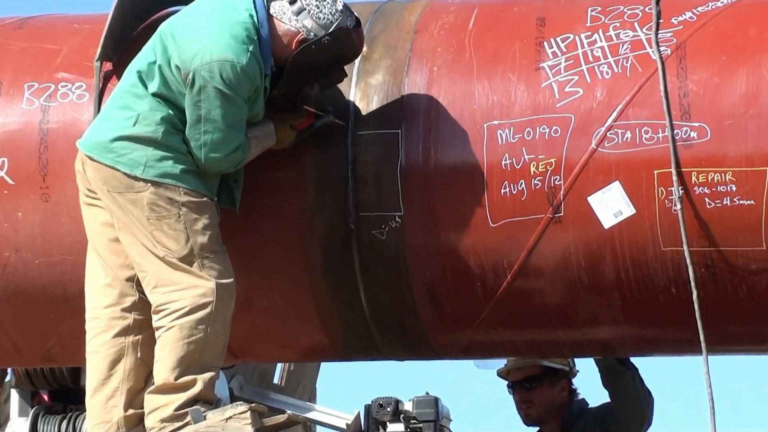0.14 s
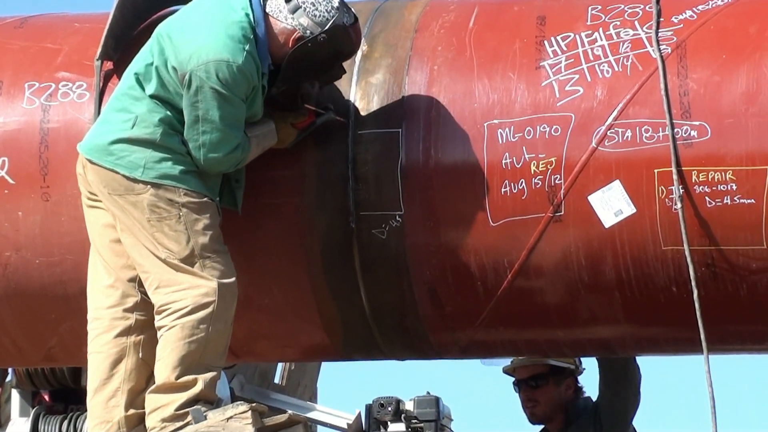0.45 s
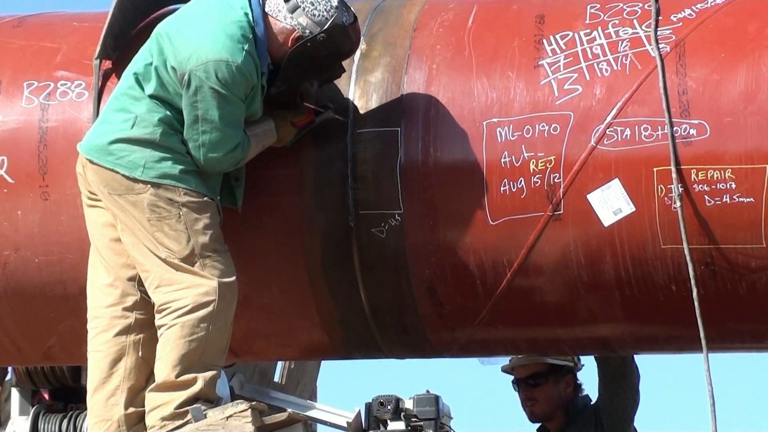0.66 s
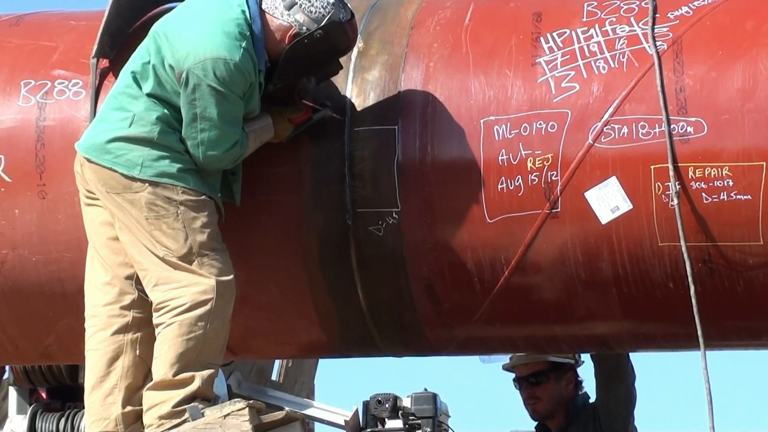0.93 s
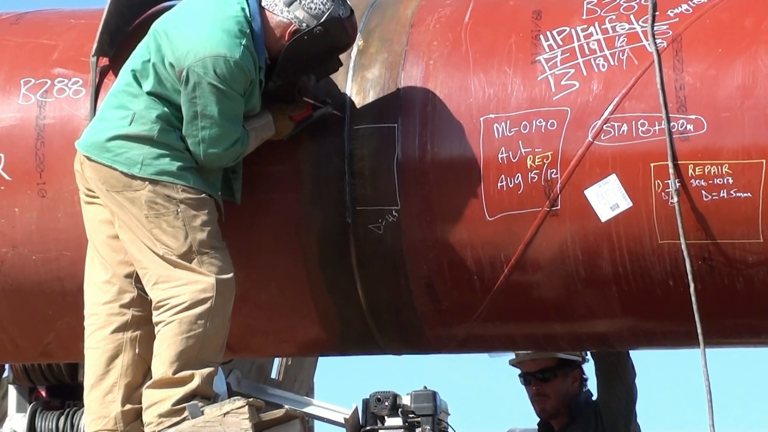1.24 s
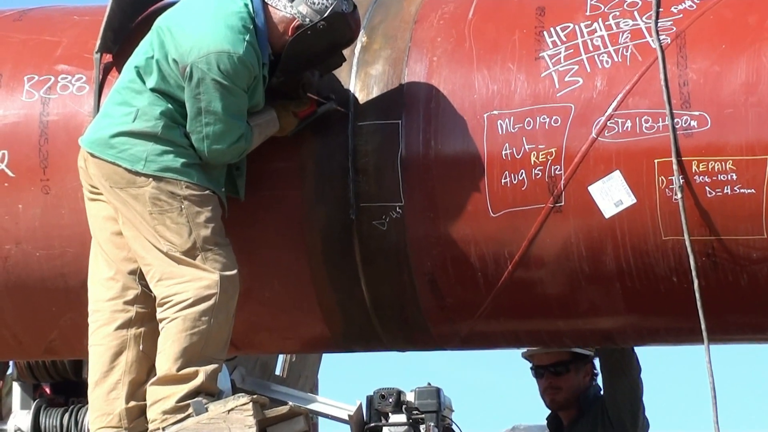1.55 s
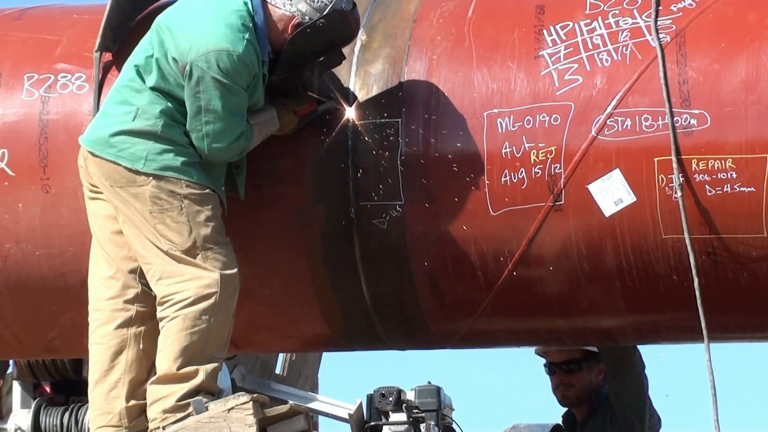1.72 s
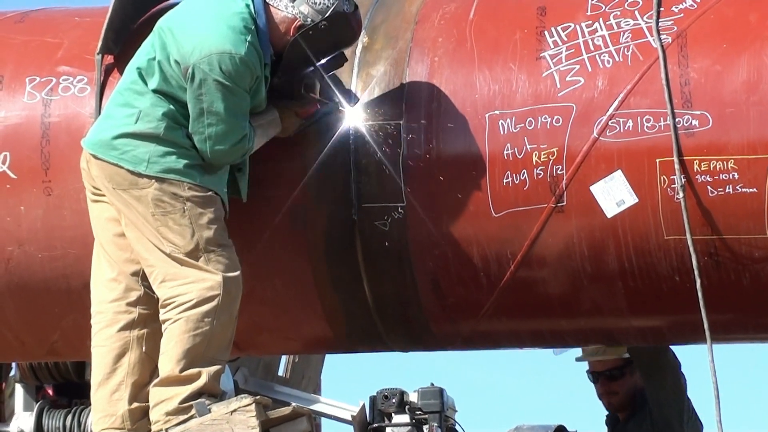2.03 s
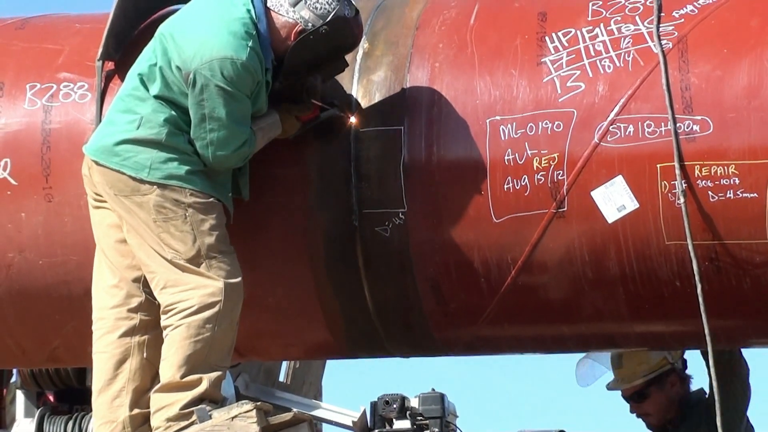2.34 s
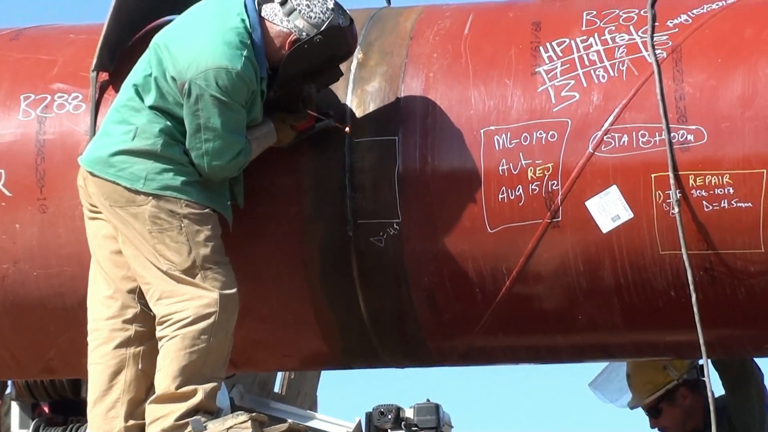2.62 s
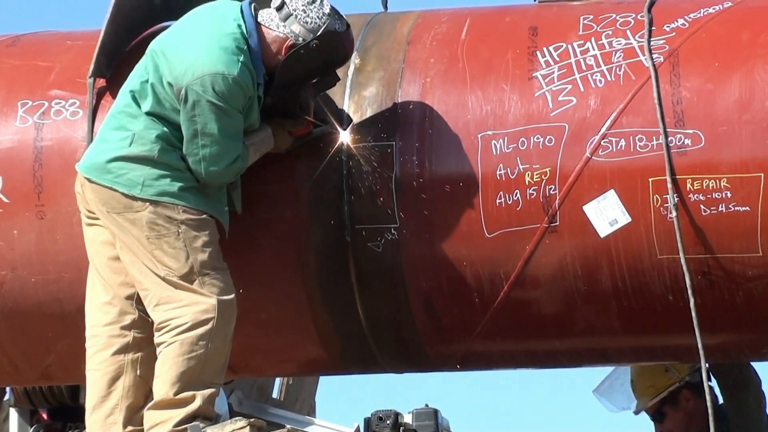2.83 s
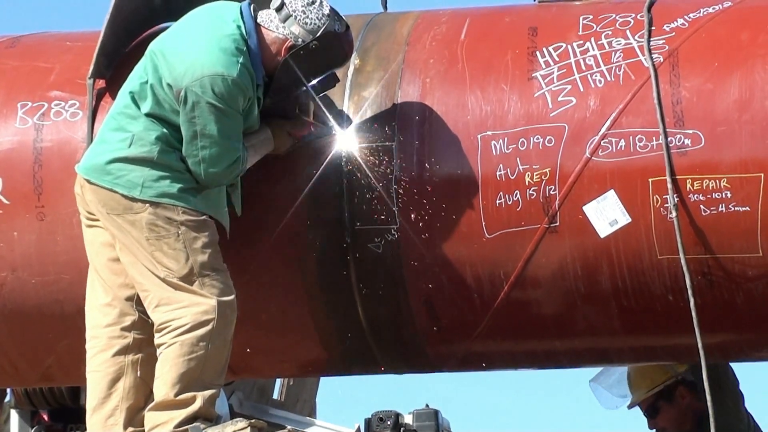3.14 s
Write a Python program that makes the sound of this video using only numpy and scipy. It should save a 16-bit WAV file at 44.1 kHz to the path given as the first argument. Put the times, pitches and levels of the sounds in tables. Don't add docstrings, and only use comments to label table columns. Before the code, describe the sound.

An air-arc gouging torch works a steel pipe outdoors. Low engines drone and throb alone until about 0.5 s, when compressed air snaps open into a bright rushing hiss, easing and shifting colour near 1.5 s. Harsh sizzling, crackling arc bursts strike at 1.7 s, longer at 2.1, then in quick sputters from 2.8 to 3.3. Camera gain ducks hiss and engines under the arcs, recovering slowly.

```python
import sys
import numpy as np
from scipy import signal
from scipy.fft import rfft, irfft
from scipy.io import wavfile
from scipy.ndimage import uniform_filter1d

SR = 44100
rng = np.random.default_rng(int(sys.argv[2]) if len(sys.argv) > 2 else 0)


def voltage_ratio(level):
    return 10 ** (np.asarray(level, float) / 20)


def unload_wav(signal):
    wavfile.write(
        sys.argv[1],
        SR,
        np.round(np.clip(np.atleast_2d(signal).T, -1, 1) * 32767).astype(np.int16),
    )


N = 144648


def rms_one(x):
    return x / np.sqrt(np.mean(x ** 2) + 1e-20)


def at_hz(points, hz):
    table_hz, values = np.array(points).T
    return np.interp(np.log(hz + 1), np.log(table_hz), values)


def drift(rate_hz):
    r = np.exp(-32 * np.pi * rate_hz / SR)
    noise = rng.standard_normal(N // 16 + 3002)
    slow = signal.lfilter([1], [1, -2 * r, r * r], noise)[3000:]
    return np.interp(np.arange(N) / 16, np.arange(len(slow)), rms_one(slow - slow.mean()))


def colour(pair, spectrum, peaks=(), alike=None, pan=None):
    hz = np.fft.rfftfreq(N, 1 / SR)
    db = at_hz(spectrum, hz)
    for peak_hz, width_hz, peak_db in peaks:
        db = db + peak_db / (1 + (2 * (hz - peak_hz) / width_hz) ** 2)
    likeness = np.clip(alike if np.isscalar(alike) else at_hz(alike, hz), 0, 1)
    mid, side = rfft(pair) * voltage_ratio(db)
    mid = np.sqrt(1 + likeness) * mid
    side = np.sqrt(1 - likeness) * side
    tilt = voltage_ratio((0 if pan is None else at_hz(pan, hz)) / 2)
    return rms_one(irfft([(mid + side) * tilt, (mid - side) / tilt], N))


# start_s, length_s, level_db, roar_share_db
STRIKES = [
    (1.723, 0.015, 10, -9),
    (1.735, 0.008, -2, 15),
    (1.776, 0.08, 6, 0),
    (2.107, 0.17, 11, 0),
    (2.818, 0.06, 9, -3),
    (2.869, 0.017, -7, 16),
    (2.89, 0.0041, -3, 6),
    (2.929, .029, 9.5, 5),
    (3.121, 0.15, 9, 0.5),
    (3.224, 0.053, -13, 7.5),
]
# pitch_hz, level_db (per Hz)
SIZZLE = [(800, -51), (4200, -9), (5300, -6), (7300, -0.5), (9000, -9.5), (11000, -23.5), (14000, -30.5),
          (16000, -16.5)]
# pitch_hz, width_hz, level_db
SIZZLE_PEAKS = [(4400, 190, 1.5), (5310, 350, 4.5), (6100, 280, -5), (7360, 280, 6), (8550, 190, 5.5),
                (10600, 700, 11), (11200, 400, -3), (12600, 1400, 9), (14500, 430, -9)]
# pitch_hz, level_db (per Hz)
FLASH = [(2000, -60), (9000, -15), (10800, 3), (13500, -6), (14200, -23), (16000, 5)]
# pitch_hz, level_db (per Hz)
ARC_ROAR = [(100, -37), (950, -16), (1300, -6), (2300, -0.5), (3500, 0.5), (4100, -6), (6000, -8),
            (11000, -50)]
# pitch_hz, width_hz, level_db
ARC_ROAR_PEAKS = [(1185, 67, 3.1), (1843, 84, 5.9), (2260, 83, 10), (2770, 100, 1.7), (3230, 130, 2.7)]
# pitch_hz, width_hz, level_db
HOLLOWS = [(2040, 250, -4), (2395, 120, -15.5), (3275, 220, -8.5), (3915, 290, -12), (4700, 140, -6),
           (5100, 100, 0.5), (5520, 110, -3), (6810, 310, -9.5), (7930, 190, -3), (8750, 160, -6),
           (9200, 250, -4.5), (13300, 250, 3)]
# pitch_hz, likeness (0-1)
TORCH_ALIKE = [(1000, .9), (2500, .97), (5000, .975), (7500, .975), (12000, .99)]


def arc():
    attack_s, release_s, flash_s, roar_lag_s = 0.005, 0.002, 0.0058, 0.017
    flash_db, roar_db = -17.5, -7
    t = np.arange(N) / SR
    sizzle, flash, roar = np.zeros((3, N))
    for start_s, length_s, level_db, share_db in STRIKES:
        u = np.maximum(t - start_s, 0)
        off = np.exp(-np.maximum(u - length_s, 0) / release_s)
        sizzle += voltage_ratio(level_db) * (1 - np.exp(-u / attack_s)) * off
        flash += voltage_ratio(level_db + flash_db) * u / flash_s * np.exp(1 - u / flash_s) * off
        swell = 1 - np.exp(-(u / min(roar_lag_s, length_s / 2)) ** 2)
        roar += voltage_ratio(level_db + share_db + roar_db) * swell * off

    spark_db = 2.8 * np.minimum(rng.exponential(1, N), 5)
    sparks_per_s, spark_share = 6500, 0.65
    sizes = voltage_ratio(spark_db) * rng.choice([-1, 1], N)
    sparks = rms_one(sizes * (rng.random(N) < sparks_per_s / SR))
    sputter = voltage_ratio(-1.5 * (drift(36.0) + drift(150.0)))
    burn = spark_share * sparks + (1 - spark_share) * rng.standard_normal((2, N))
    burn = burn * sputter
    burn[1] = np.roll(burn[1], N // 3)

    sizzling = sizzle * colour(burn, SIZZLE, SIZZLE_PEAKS + HOLLOWS, TORCH_ALIKE)
    flashing = flash * colour(burn, FLASH, HOLLOWS, TORCH_ALIKE)
    roaring = colour(burn[:, ::-1], ARC_ROAR, ARC_ROAR_PEAKS + HOLLOWS, TORCH_ALIKE)
    return sizzling + flashing + roar * voltage_ratio(0.84 * drift(39.0)) * roaring


# time_s, level_db
AIR = [
    (0, -35),
    (.525, -34),
    (0.548, -5),
    (.75, -5.5),
    (1.1, -7),
    (1.6, -11),
    (1.9, -7.5),
    (2.4, -7.5),
    (2.8, -9),
    (3.28, -10),
]
# pitch_hz, level_db (per Hz)
JET = [(800, -40), (1500, -17), (4000, -11.5), (6000, -8.5), (8000, -5), (11000, -15), (14000, -22.5),
       (16000, -12)]
POSE_S = [0.98, 1.45, 1.7]
# pitch_hz, width_hz, level_db
POSES = [
    [(6200, 500, 6.5), (7280, 820, 7), (8280, 930, 7), (9400, 560, -2), (10650, 1000, 10.5),
     (11600, 600, -4), (13450, 950, 11.5), (14600, 900, -10)],
    [(6650, 320, 9), (7100, 550, 11), (8400, 700, 2.5), (8800, 430, -3), (10000, 2000, 5.5),
     (11160, 500, -8), (12400, 800, 8), (13700, 370, 2)],
    [(6540, 420, 1.5), (7110, 530, 7.5), (8400, 640, 4), (9400, 400, -2), (10800, 1000, 5.5),
     (11600, 800, -6.5), (12850, 1200, 6.5), (14900, 690, -12)],
]


def air_jet():
    t = np.arange(N) / SR
    time_s, level_db = np.transpose(AIR)
    flutter_db = 0.47 * (drift(4.0) + drift(60.0))
    level = voltage_ratio(np.interp(t, time_s, level_db) + flutter_db)
    air = rng.standard_normal((2, N))
    hiss = 0
    for weights, peaks in zip(np.eye(len(POSES)), POSES):
        share = np.interp(t, POSE_S, weights)
        hiss = hiss + share * colour(air, JET, peaks + HOLLOWS, TORCH_ALIKE)
    return level * hiss


def patchy(x, spread_db):
    spec = signal.stft(x, nperseg=512)[2]
    field = rng.standard_normal(spec.shape[1:])
    field = uniform_filter1d(field, size=3, axis=0)
    field = uniform_filter1d(field, size=5, axis=1)
    return signal.istft(spec * voltage_ratio(spread_db * rms_one(field)), nperseg=512)[1][:, :N]


ORDERS = [2, 3, 4, 4.5, 5, 5.5, 8, 10, 11.5, 13.5, 14, 15, 16, 18.5, 20]
ORDER_DB = [-33.5, -30, -27, -35, -29.5, -36.5, -28, -38.5, -37.5, -36.5, -34.5, -40, -39, -37, -40.5]
# pitch_hz, level_db (per Hz)
ROAR = [(30, -18), (75, -49), (115, -5), (420, -11), (1010, -20.5), (8000, -25.5), (10300, -41.5),
        (16000, -50)]
# pitch_hz, width_hz, level_db
ROAR_PEAKS = [(762, 130, 4.5), (1540, 900, 1), (2270, 160, 4), (3100, 420, 4), (4030, 130, -2),
              (5950, 520, -1.5), (6630, 130, 8.5)]
# pitch_hz, level_db
ENGINE_PAN = [(60, -3.5), (110, -4.5), (200, -5.0), (380, -4.0), (700, -1.0), (1290, -2.0), (2380, -1.0),
              (4400, 0.0), (8120, 0.8), (15000, 0.0)]
# pitch_hz, likeness (0-1)
ENGINE_ALIKE = [(60, 1), (130, 1), (290, 0.85), (640, 0.85), (1410, 0.82), (3100, 0.82), (6820, 0.59),
                (15000, 1)]


def engines():
    shaft_hz, wander_hz, roar_db = 30.27, 5, -14.5
    t = np.arange(N) / SR
    tones = [(99.14, -30)]
    tones += [(order * shaft_hz, db) for order, db in zip(ORDERS, ORDER_DB)]
    drone = 0
    for hz, db in tones:
        phase = 2 * np.pi * (hz * t + rng.random()) + 0.25 * drift(wander_hz)
        sides = voltage_ratio(at_hz(ENGINE_PAN, hz) / 2 * np.array([[1], [-1]]))
        level = np.sqrt(2) * voltage_ratio(db + 6 + 1.2 * drift(wander_hz))
        drone = drone + sides * level * np.sin(phase)
    throb_db = -0.5 * np.sin(2 * np.pi * shaft_hz * t + 1.8 * drift(8.6))
    surge_db = -0.32 * drift(38.0)
    noise = voltage_ratio(throb_db + surge_db) * rng.standard_normal((2, N))
    return drone + voltage_ratio(roar_db) * colour(noise, ROAR, ROAR_PEAKS, ENGINE_ALIKE, ENGINE_PAN)


def scene():
    return patchy(arc() + air_jet(), 1.5) + engines()


def automatic_gain(dry):
    ceiling_db, fast_s, slow_s, creep_db_per_s = -13.5, 0.0012, 0.53, 3.5
    window = int(0.006 * SR) + 1
    power = np.sqrt(np.abs(uniform_filter1d(np.mean(dry ** 4, 0), window)) / 3)
    r = np.exp(-1 / (fast_s * SR))
    smooth = signal.lfilter([1 - r], [1, -r], power, zi=[power[0] * r])[0]
    fast = 10 * np.log10(smooth + 1e-12)
    step, slow, held = 44, ceiling_db, []
    for db in fast[::step]:
        if db > slow:
            slow += (db - slow) * step / SR / slow_s
        else:
            slow -= creep_db_per_s * step / SR
        held.append(slow)
    loudest = np.maximum(fast, np.repeat(held, step)[:N])
    return dry * voltage_ratio(ceiling_db - np.maximum(loudest, ceiling_db))


def top_cut(x):
    return signal.sosfilt(signal.butter(12, 16090, fs=SR, output="sos"), x)


def record(dry):
    end_fade_s, clip = 0.008, 1.3
    x = automatic_gain(dry) * np.minimum((N - np.arange(N)) / SR / end_fade_s, 1)
    x = clip * np.tanh(x / clip)
    x = signal.sosfilt(signal.ellip(12, 0.5, 60, 15700, fs=SR, output="sos"), x)
    x = signal.sosfilt(signal.butter(2, 35, "high", fs=SR, output="sos"), x)
    return top_cut(x)


dry = scene()
out = record(dry)
unload_wav(out)
```